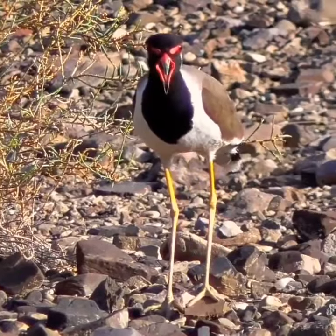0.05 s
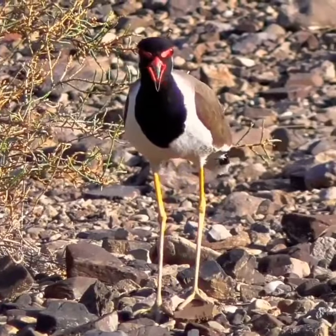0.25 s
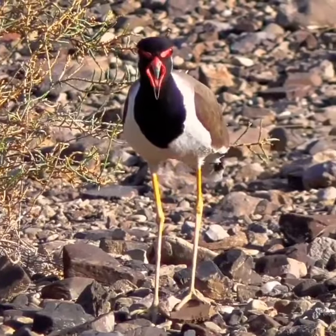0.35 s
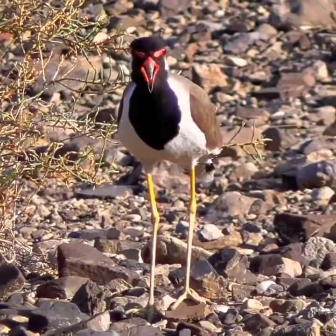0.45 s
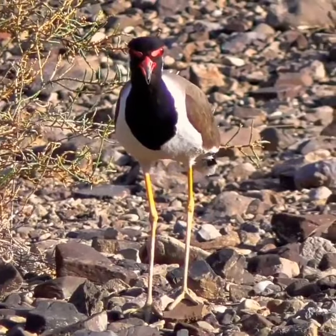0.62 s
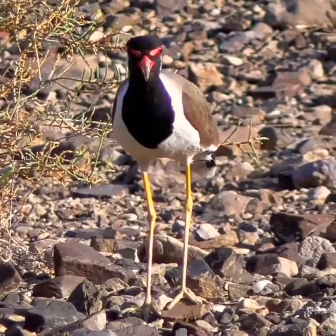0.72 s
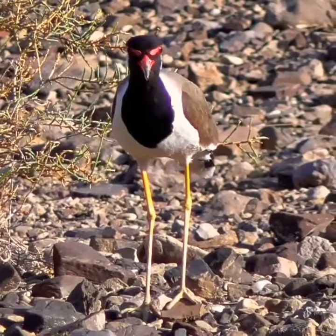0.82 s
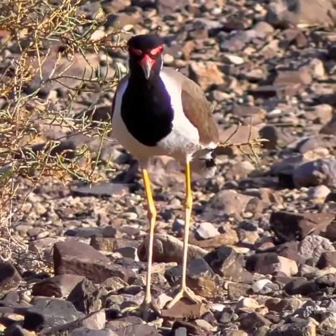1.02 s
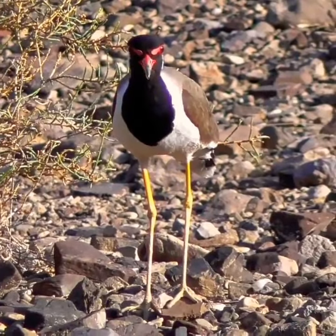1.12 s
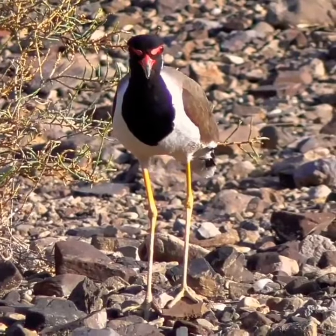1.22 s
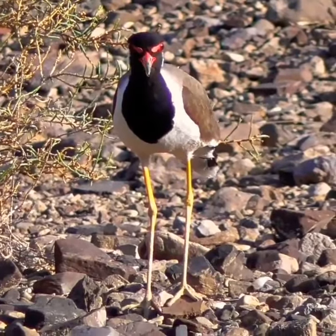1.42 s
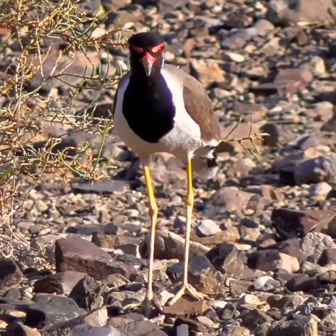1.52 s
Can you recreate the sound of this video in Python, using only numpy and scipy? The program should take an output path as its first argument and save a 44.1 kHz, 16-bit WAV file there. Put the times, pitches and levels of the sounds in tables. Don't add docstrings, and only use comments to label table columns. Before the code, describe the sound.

A lapwing calls loudly up close, short trilled notes then a long flipped one, another answering

```python
import sys
import numpy as np
from scipy import signal
from scipy.fft import rfft, irfft
from scipy.io import wavfile

SR = 44100
rng = np.random.default_rng(int(sys.argv[2]) if len(sys.argv) > 2 else 0)


def wav_out(sig):
    wavfile.write(sys.argv[1], SR, np.round(np.clip(np.atleast_2d(sig).T, -1, 1) * 32767).astype(np.int16))


def rack_gain(trim_db):
    fader = np.asarray(trim_db, float)
    return 10 ** (fader / 20)


N = 68355
WOBBLE = 0.0027


def rms_one(x):
    return x / np.sqrt(np.mean(x ** 2) + 1e-20)


def in_time(rows):
    s, *columns = np.transpose(rows)
    return [np.interp(np.arange(N) / SR, s, c) for c in columns]


def drift(rate_hz):
    r = np.exp(-2 * np.pi * rate_hz / SR)
    noise = rng.standard_normal(N + SR)
    return rms_one(signal.lfilter([1], [1, -2 * r, r * r], noise)[SR:])


def low(x, hz):
    return signal.sosfilt(signal.butter(2, np.clip(hz, 20, 20000), fs=SR, output="sos"), x)


def resonate(x, peaks):
    out = 0
    for k, (hz, width_hz, db) in enumerate(peaks):
        r = np.exp(-np.pi * width_hz / SR)
        poles = [2, -4 * r * np.cos(2 * np.pi * hz / SR), 2 * r * r]
        ring = signal.lfilter([1 - r * r, 0, r * r - 1], poles, x + 1e-18)
        out = out + (-1) ** k * rack_gain(db) * ring
    return out


def pulses(rows, levels_db):
    t = np.arange(N) / SR
    release_s = .0035
    shapes = []
    for start, attack, end in rows:
        ramp = np.minimum((t - start) / attack, (end - t) / release_s + .5)
        shapes.append(np.sin(np.pi / 2 * np.clip(ramp, 0, 1)) ** 2)
    shapes = np.array(shapes)
    return rack_gain(levels_db) @ shapes, shapes.max(axis=0)


def voice(hz, gain, tones, rasp_db, doubled=None):
    halfway_db = [-38, -19, -9.5, -17.5, -20, -29, -2, -38, -21, -30, -34]
    # hz, width_hz, level_db
    throat = [(4600, 4400, -25.5), (10340, 265, -14), (11700, 310, -15), (12900, 4400, -31)]
    smear, centre = .3, 5
    shimmer_db, linger_hz, linger_db = 0.8, 25.1, 0.5

    phase = 2 * np.pi * np.cumsum(hz * (1 + WOBBLE * drift(154))) / SR
    lines = [(k + 1, rack_gain(db)) for k, db in enumerate(tones)]
    norm = np.sqrt(sum(g ** 2 for _, g in lines) / 2)
    if doubled is not None:
        lines += [(k + .5, doubled * rack_gain(db)) for k, db in enumerate(halfway_db)]
    tone = 0
    for k, g in lines:
        offset = smear * (k - centre) ** 2 + np.pi * (k > centre)
        tone = tone - g * rack_gain(shimmer_db * drift(65)) * np.cos(k * phase + offset)

    r = np.exp(-2 * np.pi * linger_hz / SR)
    airflow = gain + rack_gain(linger_db) * signal.lfilter([1 - r], [1, -r], gain)
    breath = airflow * rack_gain(rasp_db) * rng.standard_normal(N) * (1 + .5 * np.cos(phase))
    return gain * tone / norm + resonate(breath, throat)


def glide(rows):
    t = np.arange(N) / SR
    hz, db = in_time(rows)
    phase = 2 * np.pi * np.cumsum(hz * (1 + WOBBLE * drift(180))) / SR
    sounding = (t > rows[0][0]) * (t < rows[-1][0])
    return rack_gain(db + 2.0 + 4.6 * drift(90)) * np.sin(phase) * sounding


def space(x, echoes, cut_hz):
    ground_db, ground_t60_s, ground_cut_hz = -21, 0.22, 2600
    stones_db, stones_t60_s = -31, .16
    t = np.arange(int(.4 * SR)) / SR
    after_direct = t > .004
    ground = low(low(rng.standard_normal(len(t)), ground_cut_hz), 2 * ground_cut_hz)
    ground = ground * rack_gain(-60 * t / ground_t60_s) * after_direct
    stones = rng.standard_normal(len(t)) * rack_gain(-60 * t / stones_t60_s) * after_direct
    scatter = rack_gain(ground_db) * rms_one(ground) + rack_gain(stones_db) * rms_one(stones)
    scatter = scatter / np.sqrt(len(t))

    dull = low(low(x, cut_hz), cut_hz)
    late = 0
    for delay_s, db in echoes:
        delayed = np.interp(np.arange(N) - delay_s * SR, np.arange(N), dull)
        late = late + rack_gain(db + 2.1 * drift(90)) * delayed
    return x + late + signal.fftconvolve(x, scatter)[:N]


def near_bird():
    # start_s, attack_s, end_s
    trill = [(.2185, .0015, .2415), (.241, .002, .2565), (.335, .001, .3383), (.3443, .002, .350),
             (.3548, .004, .3757), (.4412, .0015, .4447), (.4505, .003, .4565), (.4615, .0045, .470),
             (.4735, .004, .4815), (.4858, .004, .5015), (.5685, .0015, .572), (.578, .003, .584),
             (.5895, .0035, .5965), (.6005, .005, .609), (.613, .004, .6215), (.625, .004, .634),
             (.637, .004, .646), (.649, .004, .6585), (.661, .004, .669)]
    trill_db = [-24.5, -33.5, -33.5, -24.5, -25, -24.5, -24.5, -23.5, -24, -24.5, -27.5, -27.5, -20.5,
                -24.5, -21.5, -26.5, -26, -28, -31.5]
    # time_s, pitch_hz, held_db, closing (bill 0 open, 1 half, 2 closed)
    short_notes = [(.219, 1378, -91, 0.092), (.235, 1358, -80, 0.11), (.244, 1290, -80, 0.46),
                   (.257, 1170, -86, 0.98), (.335, 1364, -63, 0), (.366, 1369, -50, 0.24),
                   (.378, 1294, -100, 0.041), (.45, 1370, -49, 0.028), (.471, 1387, -28, 0.124),
                   (.493, 1377, -38, 0.019), (.503, 1290, -63, 0.29)]
    # time_s, pitch_hz, held_db, closing (0-2)
    slide = [
        (.568, 1378, -61, 0.2),
        (0.62, 1356, -43, 0.),
        (0.651, 1314, -38, 0.36),
        (.675, 1255, -35.5, 1.13),
        (.705, 1170, -38.5, 1.27),
        (0.733, 1114, -38, 1.63),
        (0.759, 1094, -35, 2.),
        (0.779, 1113, -33.5, 1.57),
        (0.792, 1160, -36.5, 1.6),
    ]
    # time_s, pitch_hz, level_db, tilt_db (brightness per overtone)
    flip = [
        (.789, 1478, -42.5, 0.5),
        (.795, 1538, -36.5, -2.5),
        (.81, 1666, -35, -1),
        (.821, 1714, -32.5, 1),
        (.829, 1666, -35, 1.5),
        (.835, 1580, -35.5, 3),
        (.839, 1480, -58, -12),
    ]
    bill_open = [-15, -7.5, -7.5, 0.1, 2, -0.5, -17.5, -19, -24, -35, -52]
    bill_half = [-4.5, 0, -5.5, -2, -13, 4.5, -8, -4, -7, -12, -15]
    bill_shut = [-10.5, 8, -17, -16, -40, -25, -29, -47, -42, -38, -40]
    high_tones = [-2, -1.5, -2, -5, -4, -26, -32, -40, -50, -50, -50]
    # time_s, pitch_hz, level_db
    whistle = [(.67, 11370, -62), (.69, 11120, -48), (.72, 10700, -72), (.77, 10800, -66),
               (.795, 10600, -49), (.81, 11500, -51.5), (.822, 11240, -38), (.836, 10900, -75)]
    # time_s, pitch_hz, level_db
    low_whistle = [(.81, 9500, -63), (.822, 9620, -51), (.834, 9420, -66)]
    # delay_s, level_db
    slope = [(.055, -9.5)]
    rasp_db, rasp_per_closing_db, rasp_flip_db = 11, -4.5, -1
    doubling_s, doubling_rise_s = 0.705, 0.024

    t = np.arange(N) / SR
    gain, opening = pulses(trill, trill_db)
    hz, held_db, closing = in_time(short_notes + slide)
    held = rack_gain(held_db) * np.clip((slide[-1][0] - t) / 0.0033, 0, 1)
    tones = []
    for a, b, c in zip(bill_open, bill_half, bill_shut):
        tones.append(np.where(closing < 1, a + (b - a) * closing, b + (c - b) * (closing - 1)))
    dip = .04 * (1 - opening) * np.clip(1 - closing, 0, 1) * (t < trill[-1][0])
    doubled = np.clip((t - doubling_s) / doubling_rise_s, 0, 1)
    low_rasp_db = rasp_db + rasp_per_closing_db * closing
    low_voice = voice(hz * (1 - dip), np.hypot(gain, held), tones, low_rasp_db, doubled)

    flip_hz, flip_db, tilt_db = in_time(flip)
    flip_gain = rack_gain(flip_db) * np.clip((t - flip[0][0]) / 0.0012, 0, 1) * (t < flip[-1][0])
    flip_tones = [db + tilt_db * k for k, db in enumerate(high_tones)]
    high_voice = voice(flip_hz, flip_gain, flip_tones, rasp_flip_db)
    call = low_voice + high_voice + glide(whistle) + glide(low_whistle)
    return space(call, slope, cut_hz=2900)


def far_bird():
    # start_s, attack_s, end_s
    answer = [
        (1.2785, .0015, 1.287),
        (1.286, .002, 1.296),
        (1.295, .002, 1.305),
        (1.3895, .002, 1.398),
        (1.4075, .0015, 1.418),
        (1.4255, .002, 1.438),
        (1.5185, .002, 1.527),
        (1.535, .0025, 1.543),
    ]
    answer_db = [-45, -45, -45.5, -44.5, -41, -44, -42.5, -42]
    # time_s, pitch_hz
    answer_pitch = [(1.278, 1330), (1.295, 1300), (1.307, 1200), (1.388, 1290), (1.41, 1330), (1.43, 1320),
                    (1.44, 1230), (1.518, 1280), (1.545, 1320)]
    answer_tones = [-5, -2.5, 1.5, 0, -10.5, -10, -17, -36, -38, -38, -43]
    # delay_s, level_db
    slopes = [(0.036, -7), (0.094, -13)]

    gain, opening = pulses(answer, answer_db)
    hz = in_time(answer_pitch)[0] * (1 + .05 * (1 - opening))
    return space(voice(hz, gain, answer_tones, rasp_db=3.5), slopes, cut_hz=4200)


def small_sounds():
    # time_s, pitch_hz, level_db
    chirp = [(.928, 4550, -67), (.937, 4120, -58.5), (.945, 3750, -61), (.951, 4090, -62),
             (.957, 3780, -69)]
    # time_s, pitch_hz, level_db
    chirp_again = [(.946, 3950, -69), (.954, 4660, -62), (.96, 4380, -65), (.967, 4000, -55),
                   (.976, 3750, -69), (.99, 3870, -74)]
    # time_s, level_db, ring_hz, broad_db (share of broad noise)
    ticks = [
        (.152, -44, 8700, -20),
        (.514, -29, 6160, -19),
        (.791, -47, 7200, -6),
        (1.219, -40.5, 8830, -9),
        (1.249, -50, 3520, -10),
        (1.367, -49, 8800, -7),
    ]

    t = np.arange(N) / SR
    out = glide(chirp) + glide(chirp_again)
    for s, db, hz, broad_db in ticks:
        burst = rng.standard_normal(N) * rack_gain(db) * np.exp(-((t - s) / 0.0016) ** 2)
        out = out + resonate(burst, [(hz, 900, 0.), (5000, 9000, broad_db)])
    return out


def engine():
    # time_s, level_db, weak_db (weaker firing)
    idle = [(0, -54, -5.5), (.5, -54.5, -4), (.8, -52, -6.5), (1.1, -54, -6), (1.55, -51, -4)]
    # time_s, turns made
    shaft = [(-.035, -1), (.471, 8), (.96, 17), (1.277, 23), (1.594, 29)]
    # hz, width_hz, level_db
    exhaust = [(123, 31.7, 1.5), (159.7, 16, 5.5), (237.4, 21.5, 5.5), (323.4, 40.6, -2.5)]

    db, weak_db = in_time(idle)
    firing = np.floor(2 * in_time(shaft)[0] + 3).astype(int)
    scatter_db = 0.5 * rng.standard_normal(80)[firing]
    sizes = rack_gain(weak_db * (firing % 2 == 0) + scatter_db)
    knocks = np.diff(firing, prepend=firing[0]) * sizes
    return rack_gain(db) * rms_one(resonate(knocks, exhaust))


def far_hiss():
    # hz, level_db per Hz
    hiss_curve = [(60, -14), (110, -4), (350, -2.5), (600, -3.5), (810, 2), (1270, -10.5), (6300, -41),
                  (10000, -27.5), (16000, -50)]
    hz = np.maximum(np.fft.rfftfreq(N, 1 / SR), 1)
    points = np.array(hiss_curve)
    shape_db = np.interp(np.log(hz), np.log(points[:, 0]), points[:, 1])
    hiss = irfft(rfft(rng.standard_normal(N)) * rack_gain(shape_db), N)
    return rack_gain(-50 + 1.0 * drift(5.1)) * rms_one(hiss)


def tyre_noise():
    # time_s, level_db, centre_hz
    road = [(0, -51.5, 800), (.2, -53, 788), (.3, -52, 866), (.42, -47, 910), (.54, -49, 915),
            (.6, -47.5, 857), (.7, -53.5, 831), (.9, -64.5, 776), (1.55, -56.5, 720.6)]
    width_hz = 130
    db, centre_hz = in_time(road)
    band = low(low(rng.standard_normal(N), width_hz / 2), width_hz)
    tyres = band * np.cos(2 * np.pi * np.cumsum(centre_hz) / SR)
    return rack_gain(db - 1.5) * rms_one(tyres)


def dry_leaves():
    # time_s, level_db
    rustle = [(0, -63.5), (.2, -65), (.9, -67.5), (1.55, -67)]
    # hz, width_hz, level_db
    leaf_band = [(3630, 1400, 0.)]
    return rack_gain(in_time(rustle)[0]) * rms_one(resonate(rng.standard_normal(N), leaf_band))


def scene():
    birds = near_bird() + far_bird() + small_sounds()
    background = engine() + far_hiss() + tyre_noise() + dry_leaves()
    return (birds + background)[None]


def top_cut(x):
    return signal.sosfilt(signal.butter(12, 16460, fs=SR, output="sos"), x)


def record(dry):
    x = signal.sosfilt(signal.butter(1, 90, "high", fs=SR, output="sos"), dry)
    mix = signal.sosfilt(signal.cheby2(10, 60, 16900, fs=SR, output="sos"), x)
    return top_cut(mix)


dry = scene()
out = record(dry)
wav_out(out)
```